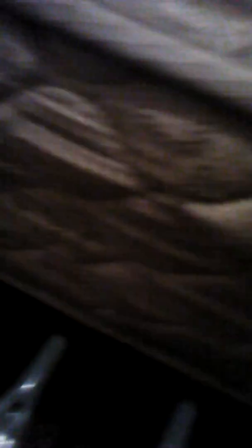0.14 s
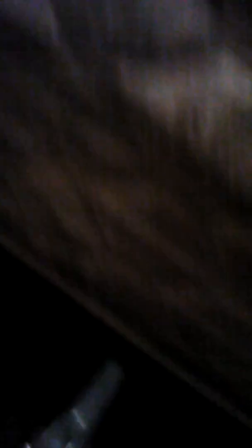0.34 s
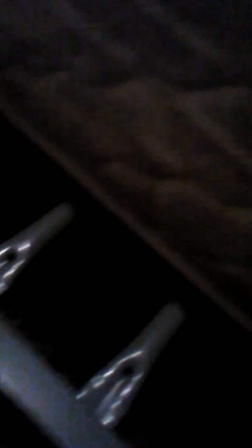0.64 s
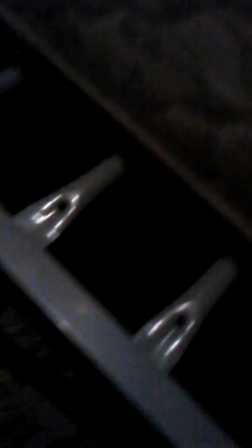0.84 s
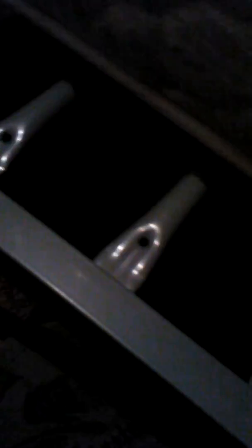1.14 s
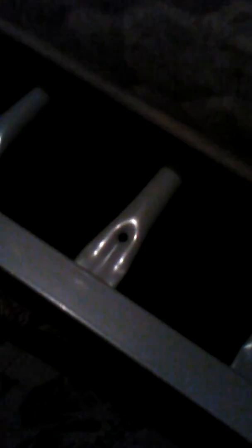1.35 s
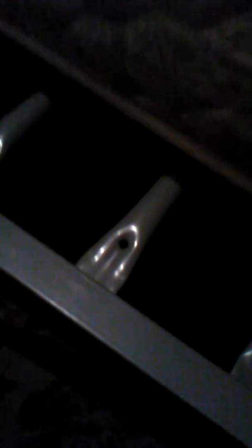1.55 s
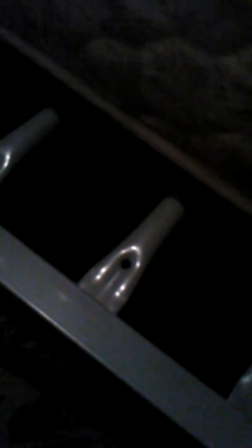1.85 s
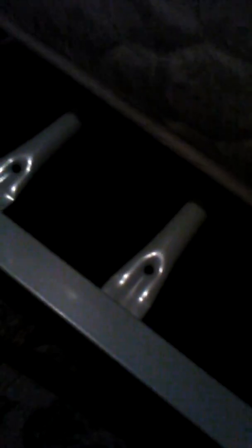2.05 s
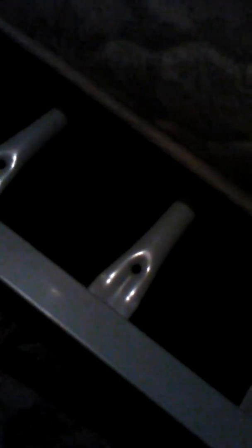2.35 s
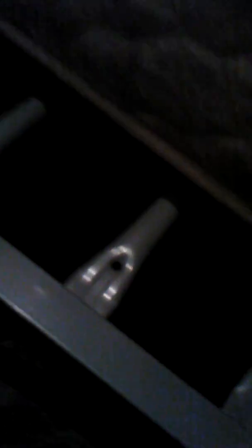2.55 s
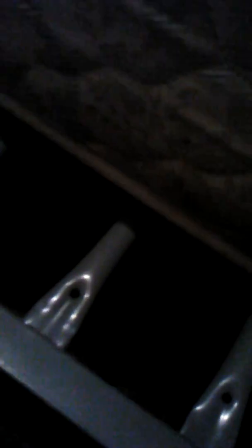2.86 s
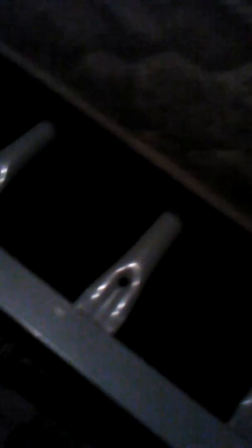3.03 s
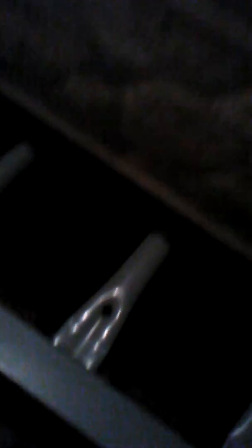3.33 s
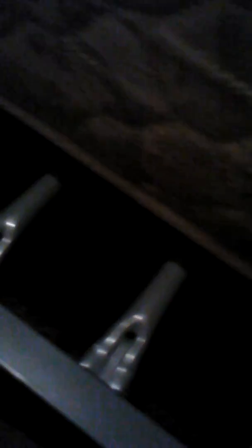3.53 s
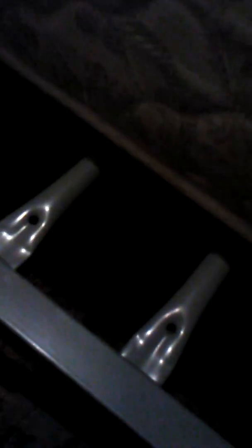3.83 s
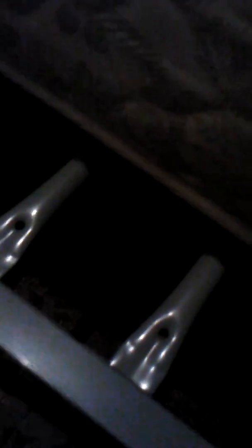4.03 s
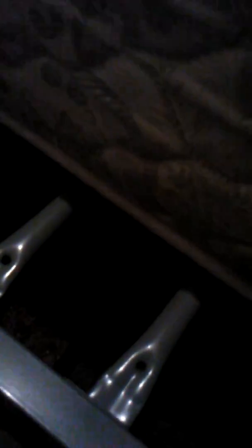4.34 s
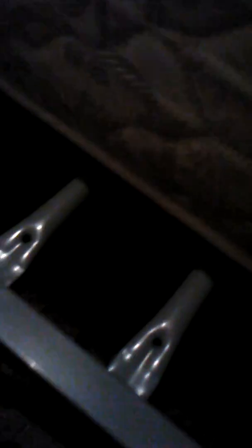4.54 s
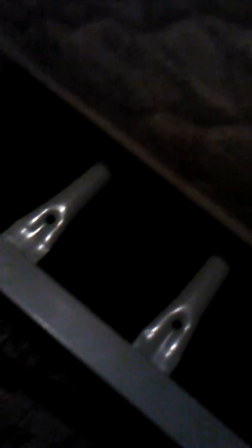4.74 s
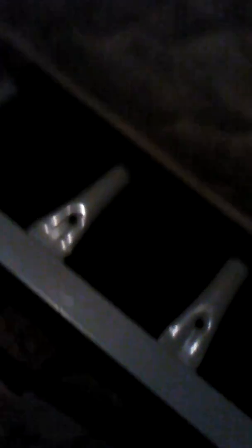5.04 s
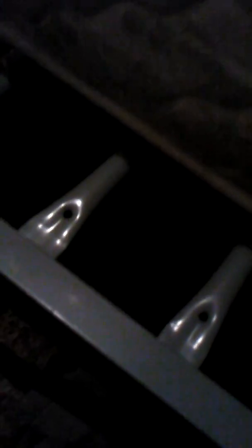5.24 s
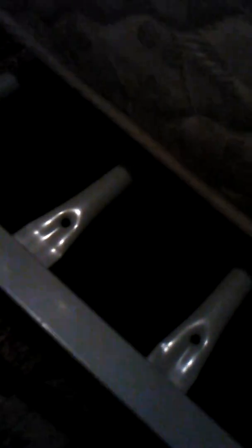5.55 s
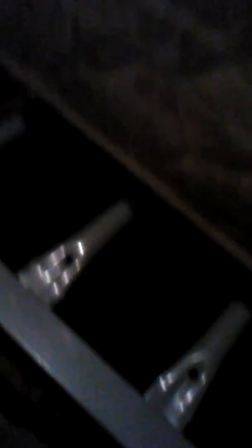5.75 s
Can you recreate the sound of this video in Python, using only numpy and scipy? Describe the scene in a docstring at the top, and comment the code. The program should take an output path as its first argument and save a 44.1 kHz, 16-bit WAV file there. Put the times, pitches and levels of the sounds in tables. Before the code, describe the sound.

Small stones clatter and roll against each other as a hand digs through a hollow container. After a light cloth rustle and a few quiet taps, loud clusters of clacks come with short pauses, then merge into steadier grinding with hollow knocks. The handheld microphone is close and picks up slight low handling rumble, along with the faint hiss and hum of a quiet room.

```python
"""Small stones clack and grind as a hand rummages in a hollow container, near a phone in a quiet room.
Each clack is a quick run of tiny collisions that makes the stones ring. Heavy stones thump the
container, tiny pebbles tick, and in between the heap rolls on. Cloth brushes by at the start,
and the hand wobbles the phone. Behind it all are a faint rumble, hiss and mains hum."""
import sys
import numpy as np
from scipy import signal
from scipy.fft import rfft, irfft, next_fast_len
from scipy.io import wavfile
from scipy.ndimage import uniform_filter1d

SR = 44100
rng = np.random.default_rng(int(sys.argv[2]) if len(sys.argv) > 2 else 0)


def transcribe(signal):
    """Save signal, clipped to [-1, 1], as a 16-bit WAV file at the path in sys.argv[1]."""
    frames = np.atleast_2d(signal).T
    limited = np.clip(frames, -1, 1)
    pcm = np.round(limited * 32767).astype(np.int16)
    wavfile.write(sys.argv[1], SR, pcm)


N = 259334
FFT_SIZE = next_fast_len(N)

# Stone hitting stone; t60 is the time a sound takes to fade by 60 dB. Columns: t/s, peak level/dB,
# low ring/Hz, high ring/Hz, small stones against big ones/dB, crack against the ringing/dB, t60/s
CLACKS = [(0.037, -33, 1220, 3990, -5, -15, 0.046), (0.046, -36, 1010, 3980, -2, -3, 0.053),
          (0.056, -30.5, 885, 3900, 7, -7, 0.026), (0.068, -31.5, 910, 3510, -5, -14, 0.072),
          (0.099, -44, 877, 2710, -16, -19, 0.098), (0.132, -43, 1040, 3800, -17, -14, 0.07),
          (0.351, -58, 977, 2420, -29, -28, 0.079), (0.478, -61, 720, 4700, -3, -12, 0.06),
          (0.688, -48, 1060, 3370, -7, -27, 0.056), (0.815, -32.5, 1190, 3280, 1, -9, 0.1),
          (0.826, -22, 1520, 3070, -1, -14.5, 0.1), (0.872, -33, 1190, 2960, 7, -21, 0.13),
          (0.887, -24.5, 1580, 2490, 4, -7.5, 0.085), (0.918, -26.5, 1110, 3100, -10, -31, 0.06),
          (0.958, -26.5, 1260, 2630, -9, -33, 0.05), (1.006, -27, 1140, 3610, -10, -36, 0.18),
          (1.055, -16, 1730, 3440, -1, -32.5, 0.06), (1.064, -16, 970, 3430, -6, -29.5, 0.075),
          (1.088, 1, 1240, 2100, -1.5, -21, 0.067), (1.096, -6.5, 1430, 2190, -16, -33.5, 0.1),
          (1.105, -0.5, 1620, 3320, -3, -23, 0.027), (1.112, -6, 1690, 2420, 4, -13, 0.06),
          (1.119, -3.5, 1600, 2440, 0, -32, 0.076), (1.134, -9, 1500, 2320, -9, -12, 0.054),
          (1.146, 3, 1434, 3540, -4, -16.5, 0.065), (1.161, -3.5, 1400, 3060, 5, -19, 0.043),
          (1.174, -11, 1440, 3800, 0, -7, 0.045), (1.196, -3.5, 1240, 2510, 20, -25, 0.042),
          (1.238, -13, 1100, 4460, 9, -22, 0.022), (1.258, -18.5, 1600, 2250, -4, 20, 0.027),
          (1.322, -8.5, 1120, 3350, 1, -15, 0.03), (1.342, -21.5, 1170, 2430, -23, -28, 0.048),
          (1.378, -23, 1100, 4700, -2, -17, 0.045), (1.409, -23, 1930, 4570, 6, -16, 0.022),
          (1.456, -15.5, 1290, 2170, -2, -29, 0.051), (1.463, -14.5, 1340, 3520, 4, -20, 0.083),
          (1.475, -8.5, 1690, 2270, 1, -13, 0.089), (1.485, -8.5, 1150, 4460, 0.5, -19, 0.088),
          (1.504, -29, 1120, 2230, -14, -27, 0.089), (1.521, -9.5, 940, 2940, -9, -36, 0.038),
          (1.533, -0.5, 1650, 3220, 0.5, -26, 0.057), (1.546, -1, 1310, 2420, -0.5, -47, 0.061),
          (1.567, -3, 964, 2920, -6.5, -50, 0.055), (1.586, -17, 1060, 2760, -22, -43, 0.037),
          (1.68, -34.5, 1530, 3350, -44, -37, 0.084), (1.777, -21, 1177, 2190, -6.5, -20.5, 0.036),
          (1.797, -30, 756, 2040, -13, -37, 0.11), (1.827, -24.5, 933, 2460, -22, -40, 0.12),
          (1.885, -22, 991, 2100, -22, -52, 0.04), (1.894, -8.5, 930, 2010, -1.5, -52, 0.098),
          (1.93, -17.5, 1190, 2460, -2.5, -42, 0.052), (2.087, -42, 872, 2600, -3.5, -36, 0.051),
          (2.164, -33.5, 1520, 3480, -5.5, -34, 0.045), (2.201, -44, 1030, 2490, -6, -24, 0.085),
          (2.234, -32, 1170, 2590, -35, -43, 0.05), (2.253, -14, 1170, 3300, -1.5, -20, 0.072),
          (2.297, -21.5, 1090, 2290, -9, -11, 0.04), (2.313, -9.5, 1050, 2100, -7, -27, 0.051),
          (2.316, -3, 1310, 2350, -12, -39, 0.053), (2.324, -3, 1290, 3880, -3.5, -27, 0.027),
          (2.34, -26, 1400, 3340, -17, -21, 0.094), (2.349, -16.5, 1420, 2550, -3, -16, 0.06),
          (2.449, -22, 1700, 2400, -8, -36, 0.079), (2.471, -17, 1700, 2500, -8, -38, 0.11),
          (2.483, -17, 1370, 3900, 0, -32, 0.06), (2.503, -20.5, 1210, 2160, -16, -40, 0.053),
          (2.618, -41, 1220, 2100, -27, -14, 0.085), (2.633, -28, 1080, 2190, -18, -38, 0.04),
          (2.656, -33.5, 1277, 2140, -25, -34, 0.075), (2.808, -43.5, 1550, 2430, -9.5, -32, 0.02),
          (2.871, -38.5, 1635, 2900, 2, -6.5, 0.15), (2.89, -30, 1420, 2230, 0, -10.5, 0.18),
          (2.918, -19, 1550, 2320, -19, -38, 0.053), (2.981, -7, 1200, 3320, 6, -10, 0.041),
          (3.008, -35, 1370, 2460, -6, 7, 0.072), (3.062, -30.5, 1030, 2340, -5.5, -27, 0.039),
          (3.299, -41, 1706, 3000, -20.5, -25.5, 0.051), (3.305, -22.5, 1550, 3300, -12, -27, 0.06),
          (3.319, -4, 1390, 2600, -8.5, -24, 0.047), (3.337, -10.5, 1530, 2250, -3, -35.5, 0.038),
          (3.387, -15, 1380, 2380, -11.5, -41, 0.048), (3.402, -26, 1470, 2330, -2, -22, 0.09),
          (3.439, -26, 1140, 5320, 2, -14, 0.11), (3.483, -23.5, 899, 2230, -15, -22, 0.078),
          (3.496, -25, 706, 3500, -8, -30, 0.081), (3.568, -7, 820, 5400, -13, -26, 0.088),
          (3.607, -12.5, 1020, 2320, -6, -17, 0.057), (3.617, -21, 1110, 2260, 9, -12, 0.06),
          (3.633, -15.5, 1240, 2730, 9, 3.5, 0.071), (3.647, -20.5, 1130, 2530, 0, -10, 0.1),
          (3.666, -25.5, 1230, 2300, 3, -14, 0.18), (3.718, -26, 1730, 2740, -8, -10.5, 0.02),
          (3.734, -30.5, 700, 2380, -7, -28, 0.11), (3.783, -28.5, 732, 2060, -11, -21, 0.12),
          (3.826, -35, 1350, 2310, -18, -18, 0.06), (3.851, -30.5, 920, 2480, -22, -16.5, 0.06),
          (3.991, -50, 1104, 2350, -20.5, -21.5, 0.042), (4.027, -46, 1130, 2720, -22.5, -23.5, 0.088),
          (4.073, -38.5, 1180, 2480, -29.5, -40, 0.076), (4.101, -35.5, 1190, 2300, -8, -34, 0.042),
          (4.173, -29, 1300, 2330, -12, -26, 0.041), (4.183, -29, 875, 2400, -17, -22, 0.046),
          (4.233, -8.5, 890, 2200, -6.5, -12, 0.045), (4.252, -2, 960, 2200, -15.5, -23, 0.035),
          (4.277, -14, 740, 2320, -8, -25, 0.14), (4.303, -7, 960, 2320, -2, -10.5, 0.06),
          (4.329, -18.5, 1140, 4470, -2, -16, 0.097), (4.371, -13.5, 1460, 2380, -2.5, -9.5, 0.06),
          (4.409, -13, 756, 3310, 2.5, -14.5, 0.06), (4.451, -18, 775, 3470, -2, -17, 0.1),
          (4.479, -22.5, 1290, 2900, -3, -23, 0.067), (4.509, -28, 1200, 2400, -5, -12, 0.069),
          (4.53, -28.5, 1260, 2350, -4, -12, 0.08), (4.585, -46, 1210, 3000, -23, -25, 0.076),
          (4.654, -23, 1170, 2270, 6, -5.5, 0.13), (4.693, -26, 1280, 4660, -8, -25, 0.079),
          (4.719, -18, 1110, 2370, -1.5, -21, 0.18), (4.799, -21.5, 1540, 3130, -1, -21, 0.064),
          (4.915, -36, 1080, 2190, -40, -41, 0.06), (4.932, -10, 870, 2360, -22, -23, 0.02),
          (4.941, -9, 770, 2340, -16, -17, 0.036), (4.957, -9.5, 1480, 2450, -12, -16.5, 0.034),
          (4.974, -14, 1190, 2360, -6, -27, 0.06), (5.015, -20.5, 830, 2450, -14, -21, 0.18),
          (5.063, -20.5, 1290, 2500, -7.5, -20, 0.18), (5.096, -9.5, 738, 3370, -14, -23, 0.078),
          (5.114, -10, 980, 3230, -7, -18.5, 0.1), (5.139, -13.5, 820, 2290, -7.5, -20, 0.14),
          (5.168, -18, 1130, 2300, -6, -16, 0.097), (5.201, -19.5, 1340, 2110, -13, -25, 0.056),
          (5.257, -20.5, 1260, 4580, -4, -29, 0.024), (5.288, -17, 1380, 4770, -6, -16, 0.045),
          (5.367, -13, 1270, 2330, -2, -18, 0.17), (5.393, -18, 1230, 2100, -6.5, -14, 0.13),
          (5.419, -20, 1400, 2330, -5, -14, 0.07), (5.431, -16.5, 990, 2280, -5, -17, 0.049),
          (5.451, -24, 1280, 2420, -3, -1, 0.06), (5.465, -7.5, 1290, 3230, -6.5, -18.5, 0.041),
          (5.509, -6, 1230, 3370, -1.5, -14.5, 0.093), (5.525, -9, 1150, 2430, 1, -13, 0.049),
          (5.572, -20, 1130, 2510, -10, -27, 0.038), (5.589, -16.5, 1520, 2340, -0.5, -25, 0.045),
          (5.615, -17, 1270, 2270, -4, -22, 0.022), (5.627, -21, 1360, 2280, -1, -11, 0.14),
          (5.678, -27.5, 1300, 4500, 2, -15, 0.092), (5.724, -21, 1280, 3870, -3.5, -19, 0.063),
          (5.791, -19, 1560, 2370, -5, -27, 0.035), (5.828, -12, 1320, 2200, 5.5, -10.5, 0.024),
          (5.864, -13.5, 1280, 3100, -2, -24, 0.11)]
# Stones hitting the container: t/s, peak level/dB, main ring/Hz, t60 of the rocking/s
THUMPS = [(0.021, -36, 305, 0.068), (0.049, -32, 258, 0.22), (0.158, -46.5, 288, 0.13),
          (0.65, -44.5, 266, 0.2), (0.96, -38.5, 388, 0.093), (1.007, -33.5, 326, 0.064),
          (1.088, -23, 322, 0.093), (1.143, -24, 422, 0.075), (1.339, -42.5, 470, 0.075),
          (1.485, -24.5, 388, 0.14), (1.53, -27.5, 380, 0.045), (1.56, -35, 308, 0.066),
          (1.796, -29, 248, 0.045), (1.965, -44, 384, 0.18), (2.254, -37, 380, 0.075),
          (2.308, -38, 320, 0.075), (2.979, -34.5, 374, 0.06), (3.32, -41, 277, 0.075),
          (3.388, -34, 320, 0.075), (3.438, -27.5, 330, 0.052), (3.568, -24.5, 400, 0.068),
          (3.59, -19, 388, 0.079), (3.611, -45, 330, 0.075), (3.65, -27, 310, 0.064),
          (3.665, -26.5, 253, 0.075), (3.758, -37, 253, 0.22), (3.866, -33.5, 257, 0.11),
          (4.231, -18.5, 258, 0.045), (4.253, -14, 296, 0.063), (4.298, -14.5, 244, 0.12),
          (4.402, -19, 326, 0.15), (4.476, -29, 318, 0.059), (4.536, -32, 340, 0.075),
          (4.67, -27, 314, 0.22), (4.752, -27.5, 409, 0.1), (4.933, -12.5, 313, 0.12),
          (4.955, -17.5, 310, 0.21), (5.014, -20.5, 335, 0.18), (5.11, -18.5, 297, 0.073),
          (5.142, -26, 202, 0.14), (5.282, -26.5, 333, 0.07), (5.37, -26.5, 387, 0.053),
          (5.401, -22.5, 271, 0.14), (5.466, -16.5, 317, 0.083), (5.509, -5.5, 250, 0.034),
          (5.642, -22.5, 347, 0.18), (5.799, -29.5, 257, 0.2), (5.843, -24.5, 258, 0.11)]
# Modes, the pitches at which each thing rings when struck: f/Hz, width/Hz, level/dB
BIG_STONES = [(798, 160, -8.5), (948.3, 29.5, 1.5), (1151, 112, -3), (1461, 109, -1.5), (1601, 39, 1),
              (1999, 580, -10)]
SMALL_STONES = [(2423, 192, 1.5), (2796, 280, -4.5), (3143, 490, -2), (3534, 380, -1), (4233, 346, -1.5),
                (5085, 750, -6.5), (5950, 640, -9.5), (6675, 250, -32), (7930, 600, -22)]
CONTAINER = [(119, 26, -14.5), (252.3, 34, -1), (336, 22, -0.5), (373.3, 55, -2.5), (559, 660, -10)]
# Tone colour of the bright crack of a hit: f/Hz, level/dB
CRACK = [(3000, -7), (5000, -14.5), (6500, 3.5), (9000, -2.5), (12000, -9.5), (16500, -20.5),
         (20000, -56.5)]


def clack(level_db, low_hz, high_hz, small_db, crack_db, t60):
    """Stone hits stone: a hard first tap, a dying rattle, then loose chips settling."""
    t, hz = np.arange(6144) / SR, np.fft.rfftfreq(6144, 1 / SR)
    rise = 1 - np.exp(-t / .0012)
    fade = np.cos(np.pi / 2 * np.minimum(t / .125, 1)) ** .5
    blow = rise * dying(t, t60) * fade
    settling = gain_of(-16) * dying(t, t60=.23) * (t > .004) * fade
    taps = collisions(len(t), per_s=7000, spread_db=5.5)
    # The shorter the blow, the more its first tap stands out.
    taps[np.argmax(blow)] = gain_of(13 - 2.5 * np.log2(t60 / .06))
    big, small = resonance(vary(BIG_STONES), hz), resonance(vary(SMALL_STONES), hz)
    # The stones hit hardest ring above the heap, but only during the blow.
    width_hz, own_db = 170, 4.5
    big_struck = big + resonance([(low_hz, width_hz, own_db)], hz)
    small_struck = small - resonance([(high_hz, 280, own_db)], hz)
    crack = filtered(taps * (blow + settling) ** 1.28, gain_of(look_up(CRACK, hz)))
    sound = gain_of(crack_db) * match_energy(crack, blow)
    for envelope, low, high in ((blow, big_struck, small_struck), (settling, big, small)):
        force = taps * envelope
        body = match_energy(filtered(force, low * contact(hz, soft_hz=3050)), envelope)
        clink = match_energy(filtered(force, high * contact(hz, soft_hz=6260)), envelope)
        sound += (body + gain_of(small_db) * clink) / np.sqrt(1 + gain_of(2 * small_db))
    smooth_end = signal.windows.tukey(2 * len(t), .1)[len(t):]
    return with_peak(sound, level_db) * smooth_end


def thump(level_db, ring_hz, t60):
    """A heavy stone shoves the container wall and rocks to rest; the hollow body booms."""
    t, hz = np.arange(8192) / SR, np.fft.rfftfreq(8192, 1 / SR)
    shove = np.sin(np.pi * np.minimum(t / .00178, 1))  # one push, under 2 ms long
    rocking = collisions(len(t), per_s=270, spread_db=5.5) * dying(t, t60)
    force = shove + gain_of(-9.5) * np.convolve(rocking, shove[:200])[:len(t)]
    boom = filtered(force, resonance(CONTAINER + [(ring_hz, 35, 5)], hz))
    return with_peak(boom, level_db)


def grind():
    """Rolling stones: thousands of small taps a second ring the heap and the container."""
    # How hard the hand stirs each layer: t/s, big stones/dB, container/dB, gravel/dB, grit/dB
    stirring = [(0.0, -64, -46.5, -65, -68), (.41, -81, -71, -88, -92), (.8, -74, -61, -75, -84),
                (1.0, -51, -60, -59, -65), (1.2, -43, -62, -37, -44), (1.42, -58, -59, -66, -62),
                (1.59, -38, -54, -51, -64), (1.76, -61.5, -57, -71, -71), (1.84, -55, -56, -59, -68),
                (2.0, -63, -60.5, -70, -70), (2.19, -59, -58.5, -62, -81), (2.42, -40, -58.5, -48, -64),
                (2.66, -63.5, -62, -68, -72.5), (3.28, -75, -61, -82, -85), (3.5, -54, -56, -50, -58.5),
                (3.68, -49, -50, -49, -63.5), (3.9, -65.5, -57, -72.5, -81), (4.15, -64, -55, -77, -87),
                (4.36, -44, -37, -47, -62), (4.75, -40.5, -43, -52, -61), (4.9, -51.5, -46.5, -56.5, -63),
                (5.1, -39, -32.5, -37, -49), (5.26, -46, -39, -48.5, -57), (5.5, -42, -37.5, -37.5, -47),
                (5.65, -40, -42, -39.5, -50.5), (5.76, -49, -44.5, -58, -66), (5.88, -50, -41, -52, -55)]
    times, big_db, container_db, gravel_db, grit_db = np.transpose(stirring)
    t, hz = np.arange(N) / SR, np.fft.rfftfreq(FFT_SIZE, 1 / SR)
    lumps = waver(FFT_SIZE, depth_db=2, smooth_samples=300)  # the stones flow unevenly
    # tone colour, stirring/dB, hits that set it rolling, roll against the hit/dB
    layers = [(resonance(BIG_STONES, hz) * contact(hz, soft_hz=2660), big_db, CLACKS, -26),
              (resonance(CONTAINER, hz) * contact(hz, soft_hz=910), container_db, THUMPS, -8),
              (resonance(SMALL_STONES, hz) * contact(hz, soft_hz=6000), gravel_db, CLACKS, -24),
              (gain_of(look_up(CRACK, hz)), grit_db, CLACKS, -42)]
    sound = np.zeros(N)
    for colour, stir_db, hits, roll_db in layers:
        gain = rolling_gain(np.interp(t, times, stir_db), hits, roll_db)
        taps = lumps * collisions(FFT_SIZE, per_s=8000, spread_db=1.5)
        sound += gain * unit_rms(filtered(taps, colour)[:N])
    return sound


def rolling_gain(stir_db, hits, roll_db, t60=.18):
    """The hand keeps the stones moving, and each hit adds energy that dies away."""
    kicks = np.zeros(N)
    for start, hit_db, *_ in hits:
        kicks[round(start * SR)] += gain_of(2 * (hit_db + roll_db))
    roll_energy = signal.lfilter([1], [1, -gain_of(-120 / (t60 * SR))], kicks)
    return np.sqrt(gain_of(2 * stir_db) + uniform_filter1d(roll_energy, size=600))


def tick(level_db, low_cut_hz=5000):
    """A tiny pebble ticks once: a short, hard contact that is all treble."""
    t, hz = np.arange(1024) / SR, np.fft.rfftfreq(1024, 1 / SR)
    force = rng.standard_normal(len(t)) * dying(t, t60=.012)
    low_cut = 1j * hz / (low_cut_hz + 1j * hz)
    return with_peak(filtered(force, low_cut ** 2), level_db)


def phone_wobble():
    """The hand shakes the phone: a deep, steady tremble with sudden jolts."""
    jolts = [(.21, -52), (1.1, -36), (1.91, -48), (2.29, -41), (2.59, -43.5), (3.44, -45.5), (3.62, -47),
             (3.75, -43), (4.31, -27), (4.53, -53), (4.98, -39), (5.13, -29), (5.52, -34)]  # the hand's jolts: t of the peak/s, level/dB
    shake_colour = [(20, -44), (45, -12.5), (70, 4.5), (110, 5), (150, -14), (250, -41.5)]  # the shaken phone's rumble: f/Hz, level/dB
    tremble = gain_of(-57.5)
    jolting = sum(swell(*jolt, rise_s=.023, fall_s=.062) for jolt in jolts)
    return (tremble + jolting) * coloured_noise(shake_colour)


def cloth():
    """Cloth brushes near the phone in soft swells of hiss."""
    brushes = [(.056, -51, 0.043, 0.052), (.22, -65.5, 0.27, 0.074), (.574, -56.5, 0.07, 0.16)]  # strokes of cloth: t of the peak/s, level/dB, rise/s, fall/s
    cloth_colour = [(2500, -13), (5000, 2.5), (7500, 9), (10000, 8), (14000, -1), (17000, -10)]  # the hiss of rubbing: f/Hz, level/dB
    return sum(swell(*brush) for brush in brushes) * coloured_noise(cloth_colour)


def room_echo(sound):
    """The room sends back many small echoes; each frequency fades at its own speed."""
    fade_times = [(200, 0.3), (1000, 0.16), (4000, 0.047), (12000, 0.32)]  # how long the room rings: f/Hz, t60/s
    echoes = np.zeros(SR // 2)
    slots = np.arange(260, SR // 2 - 20, 20)  # one echo somewhere in every 20 samples
    echoes[slots + rng.integers(0, 20, len(slots))] = rng.choice([-1., 1.], len(slots))
    hz, t, bands = signal.stft(echoes, SR, nperseg=256)
    _, tail = signal.istft(bands * dying(t, look_up(fade_times, hz)[:, None]), SR, nperseg=256)
    return signal.fftconvolve(sound, tail / np.linalg.norm(tail))[:N]


def background():
    """Steady room rumble and microphone hiss, with a wavering mains hum."""
    hush_colour = [(20, -23), (40, -12), (60, -6), (100, -26), (160, -2), (260, -8), (400, -19),
                   (900, -19.5), (1400, -32), (2200, -48), (5000, -35), (9000, -35), (13000, -37),
                   (17000, -37)]  # rumble and hiss: f/Hz, level/dB
    t = np.arange(N) / SR
    sound = gain_of(-59.5) * coloured_noise(hush_colour)
    for hum_hz, rms_db in ((59, -58.5), (119, -58)):
        hum = np.sqrt(2) * gain_of(rms_db) * np.sin(2 * np.pi * hum_hz * t)
        sound += hum * waver(N, depth_db=.79, smooth_samples=3000)
    return sound


def collisions(size, per_s, spread_db):
    """Taps at random moments, each with a random direction and strength."""
    hit = rng.random(size) < per_s / SR
    direction = rng.choice([-1., 1.], size)
    return hit * direction * gain_of(spread_db * np.minimum(rng.exponential(1, size), 3))


def contact(hz, soft_hz):
    """A collision lasts a moment, so it has little force above soft_hz."""
    return 1 / (1 + 1j * hz / soft_hz) ** 2


def vary(modes):
    """No two stones are alike: shifts the pitch and level of each mode a little."""
    return [(f * rng.uniform(.93, 1.07), width, db + rng.normal(0, 2.5)) for f, width, db in modes]


def resonance(modes, hz):
    """How an object answers each frequency: one peak for each mode, alternating in sign."""
    return sum((-1) ** k * gain_of(db) * 1j * hz * width / (f ** 2 - hz ** 2 + 1j * hz * width)
               for k, (f, width, db) in enumerate(modes))


def filtered(sound, colour):
    """Multiplies each frequency of a sound by its own gain."""
    return irfft(rfft(sound) * colour, len(sound))


def coloured_noise(colour_table):
    """Steady noise with the tone colour given by a table."""
    colour = gain_of(look_up(colour_table, np.fft.rfftfreq(FFT_SIZE, 1 / SR)))
    return unit_rms(filtered(rng.standard_normal(FFT_SIZE), colour)[:N])


def swell(peak_s, level_db, rise_s, fall_s):
    """A gain that climbs 20 dB in rise_s to its peak, then drops 20 dB in fall_s."""
    t = np.arange(N) / SR - peak_s
    return gain_of(level_db - 20 * np.where(t < 0, -t / rise_s, t / fall_s))


def waver(size, depth_db, smooth_samples):
    """A gain that drifts at random around 1."""
    return gain_of(depth_db * unit_rms(uniform_filter1d(rng.standard_normal(size), smooth_samples)))


def dying(t, t60):
    """A gain that falls 60 dB every t60 seconds."""
    return gain_of(-60 * t / t60)


def look_up(table, hz):
    """Reads between a table's rows on a logarithmic frequency scale."""
    f, value = np.transpose(table)
    return np.interp(np.log(hz + 1), np.log(f + 1), value)


def gain_of(db):
    """Turns decibels into a multiplier."""
    return 10 ** (np.asarray(db) / 20)


def unit_rms(sound):
    """Scales a sound so that its average level (rms) is 1."""
    return sound / np.sqrt(np.mean(sound ** 2) + 1e-20)


def match_energy(sound, envelope):
    """Scales a sound to hold as much energy as the envelope (its loudness curve)."""
    return sound / np.sqrt(np.sum(sound ** 2) / np.sum(envelope ** 2))


def with_peak(sound, level_db):
    """Scales a sound so that it peaks at level_db."""
    return gain_of(level_db) * sound / abs(sound).max()


def add(mix, start_s, sound):
    """Mixes a sound in at start_s."""
    part = mix[round(start_s * SR):][:len(sound)]
    part += sound[:len(part)]


def scene():
    """The stones and their echo, over the handling noise and the background, in mono."""
    ticks = [(0.8205, -36), (0.8894, -36), (1.089, -23), (1.1468, -16), (1.1972, -26), (1.2356, -39),
             (1.257, -23), (1.3209, -20), (1.3788, -32), (1.4077, -34), (2.255, -43), (2.3136, -27),
             (2.4818, -35), (2.6274, -31.5), (2.9811, -30), (3.4394, -25), (3.6331, -25), (3.718, -33),
             (4.233, -16), (4.3026, -34), (4.3715, -41), (4.4089, -44), (4.6538, -29), (5.2889, -40),
             (5.4655, -33), (5.5084, -31), (5.6256, -31), (5.8282, -43)]  # tiny pebbles landing: t/s, peak level/dB
    stones = grind()
    for start, *settings in CLACKS:
        add(stones, start - .0015, clack(*settings))
    for start, *settings in THUMPS:
        add(stones, start - .0012, thump(*settings))
    for start, level_db in ticks:
        add(stones, start - .0005, tick(level_db))
    handling = phone_wobble() + cloth()
    return (stones + gain_of(-9) * room_echo(stones) + background() + handling)[None]


def record(dry):
    """The microphone rounds off the loudest peaks; then the highest treble is cut."""
    rounded = 1.154 * np.tanh(dry / 1.558)
    treble_cut = signal.firwin(511, cutoff=16980, window=("kaiser", 9), fs=SR)
    return signal.oaconvolve(rounded, treble_cut[None], "same")


dry = scene()
out = record(dry)
transcribe(out)
```